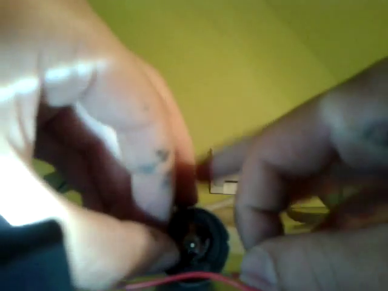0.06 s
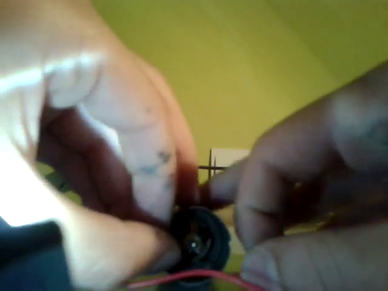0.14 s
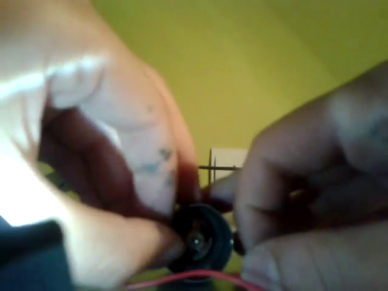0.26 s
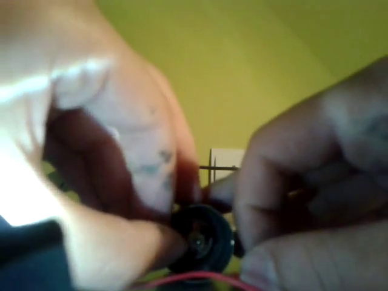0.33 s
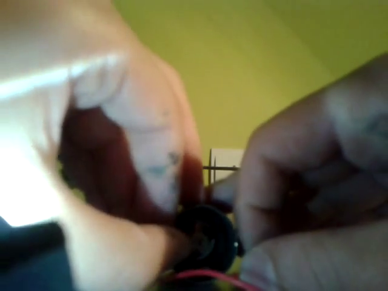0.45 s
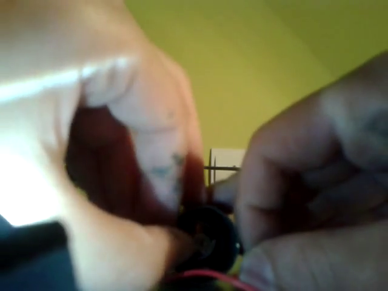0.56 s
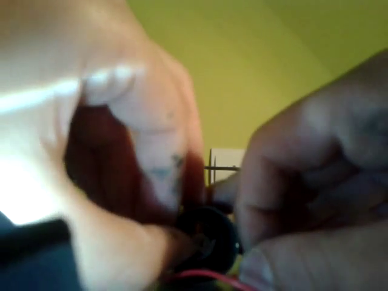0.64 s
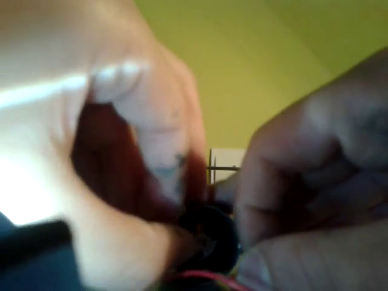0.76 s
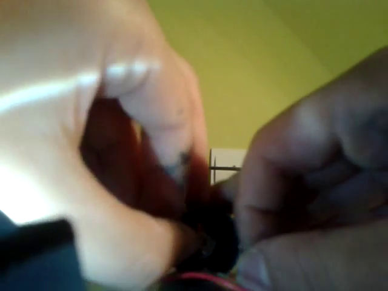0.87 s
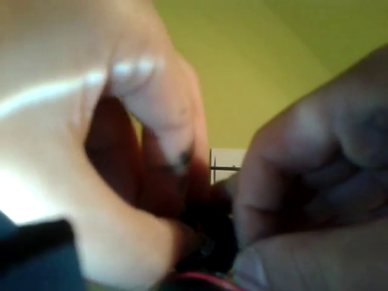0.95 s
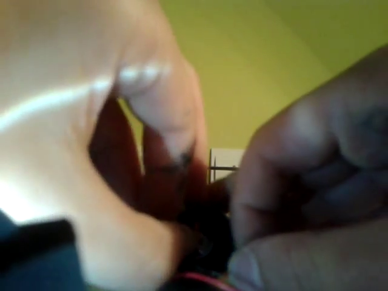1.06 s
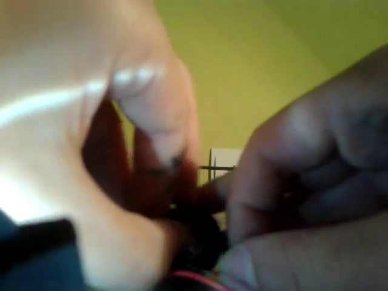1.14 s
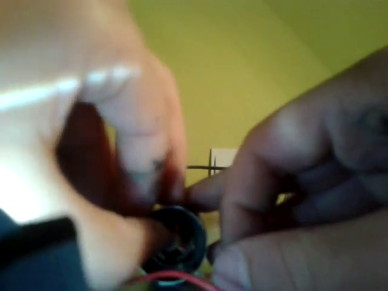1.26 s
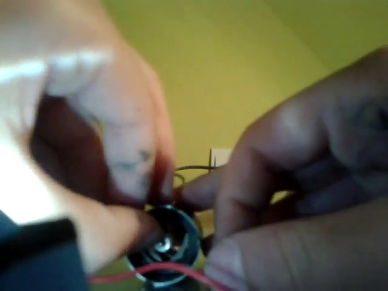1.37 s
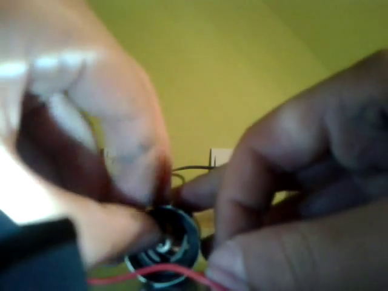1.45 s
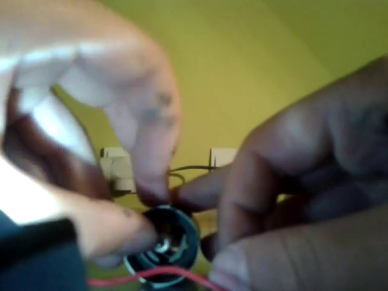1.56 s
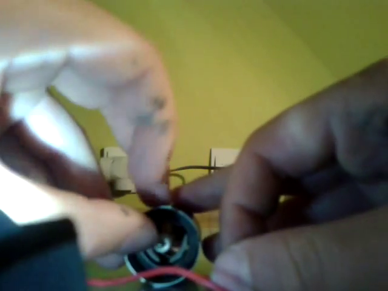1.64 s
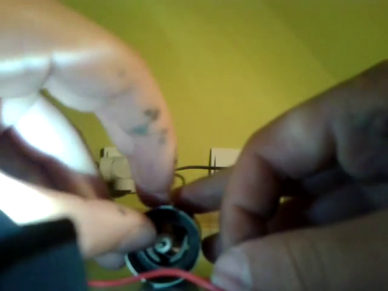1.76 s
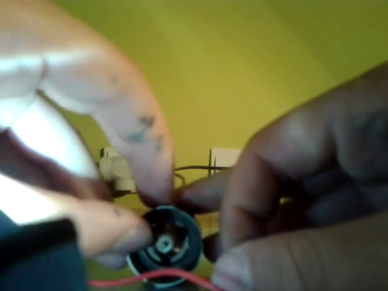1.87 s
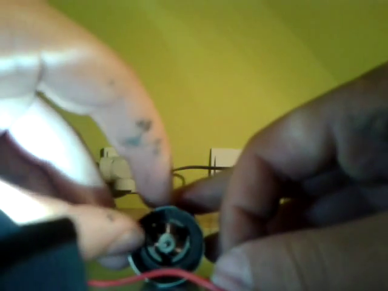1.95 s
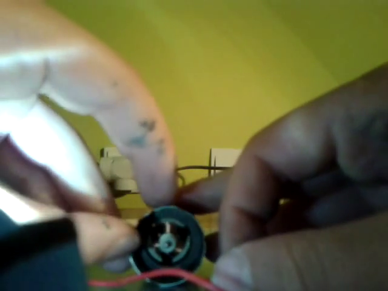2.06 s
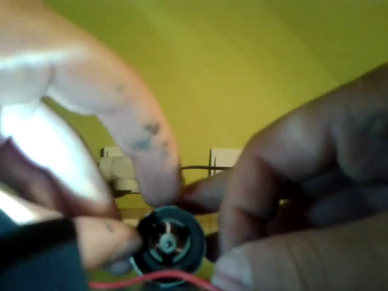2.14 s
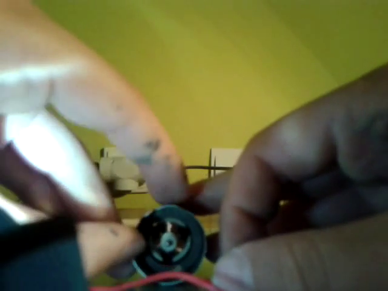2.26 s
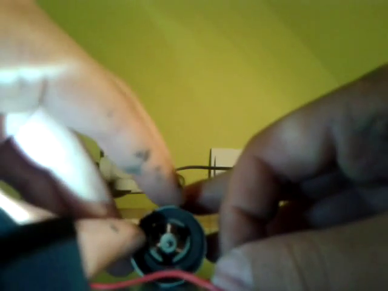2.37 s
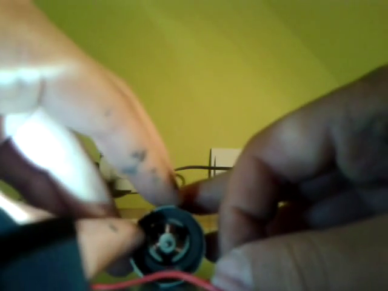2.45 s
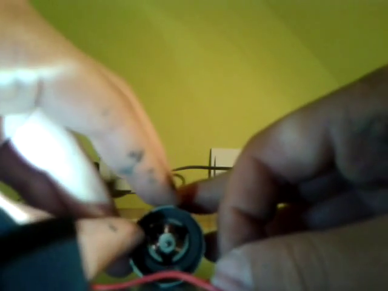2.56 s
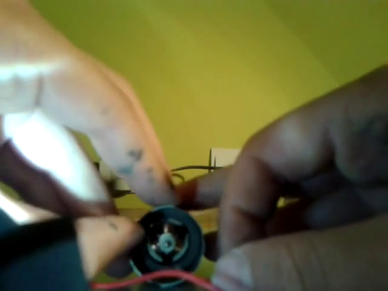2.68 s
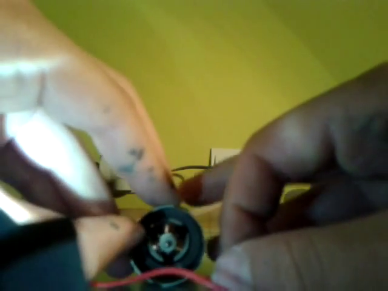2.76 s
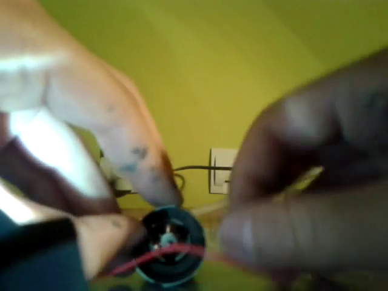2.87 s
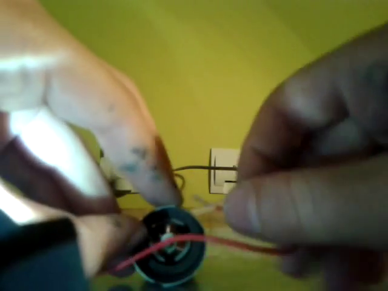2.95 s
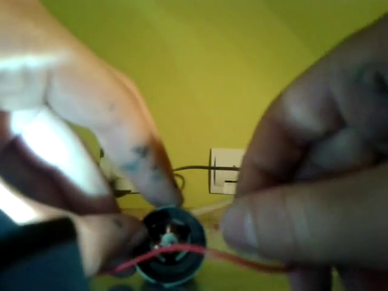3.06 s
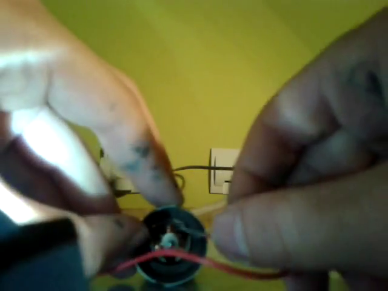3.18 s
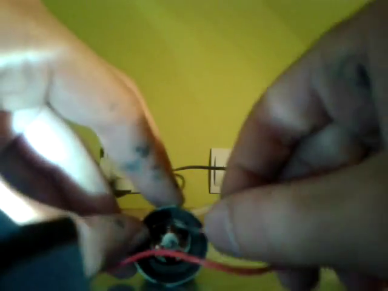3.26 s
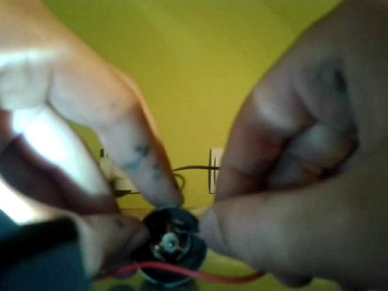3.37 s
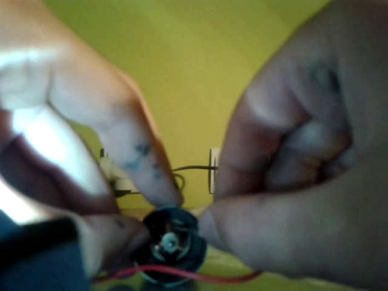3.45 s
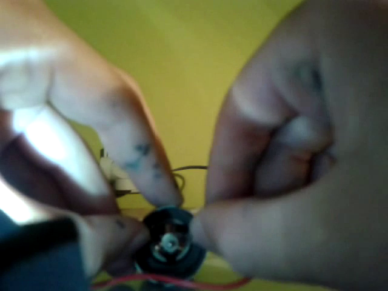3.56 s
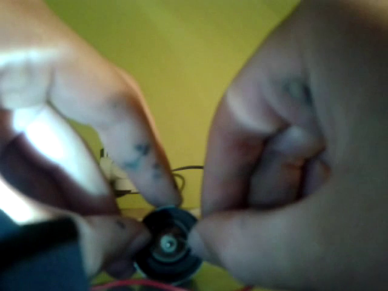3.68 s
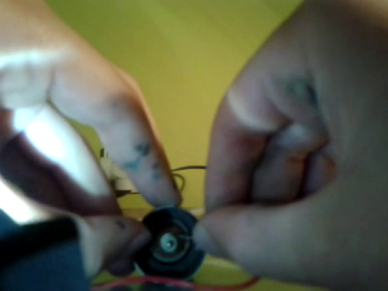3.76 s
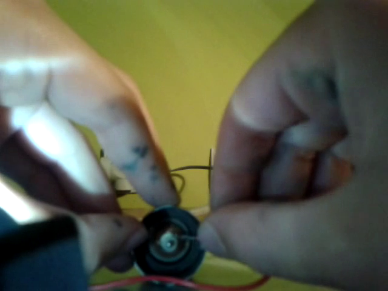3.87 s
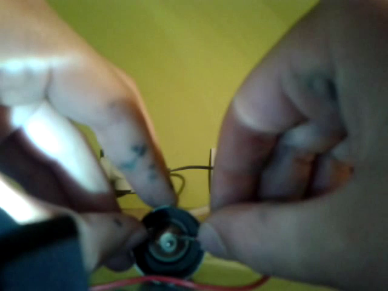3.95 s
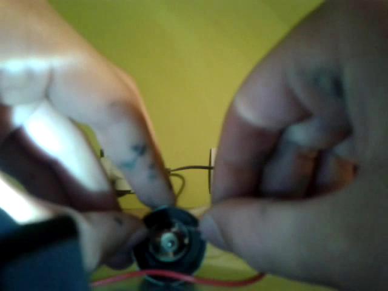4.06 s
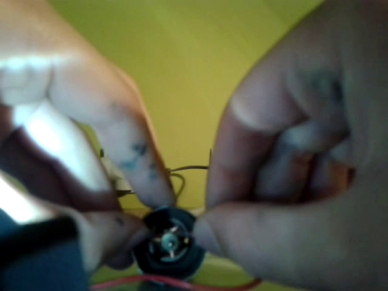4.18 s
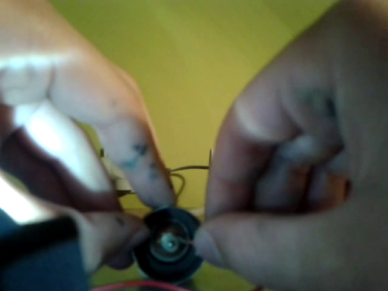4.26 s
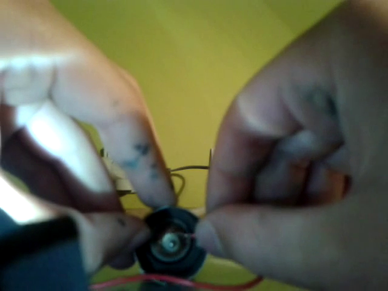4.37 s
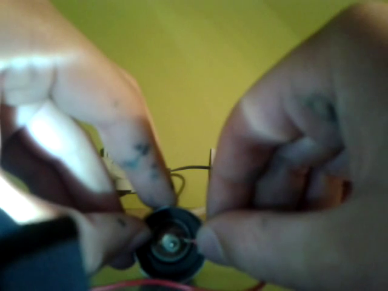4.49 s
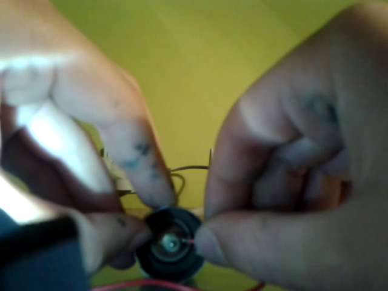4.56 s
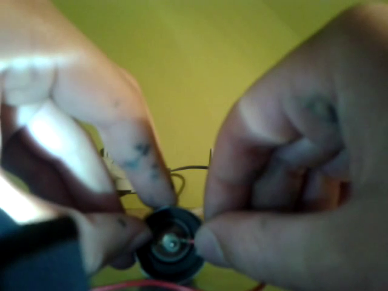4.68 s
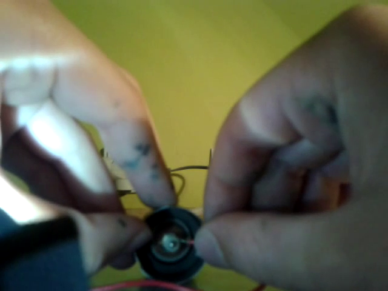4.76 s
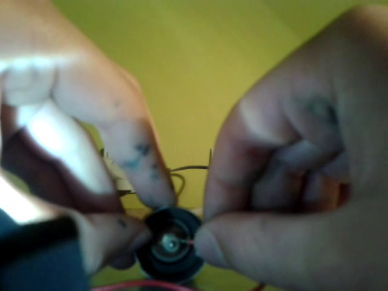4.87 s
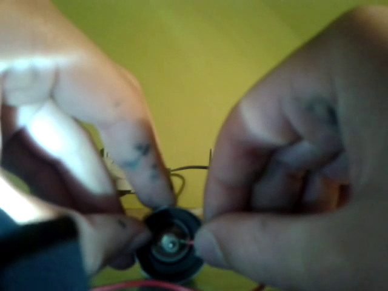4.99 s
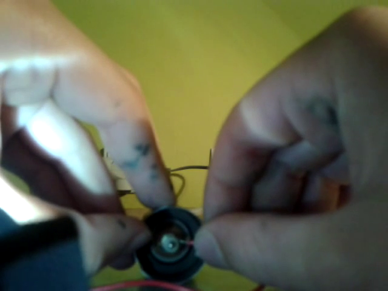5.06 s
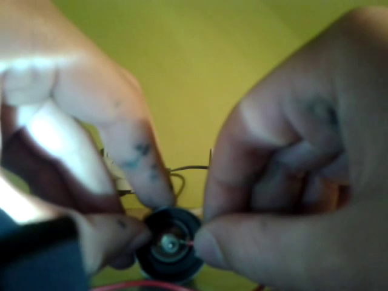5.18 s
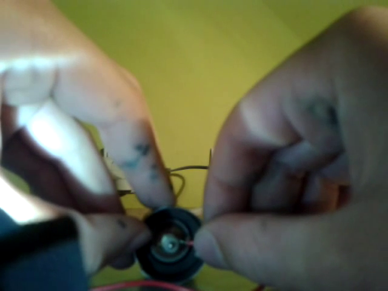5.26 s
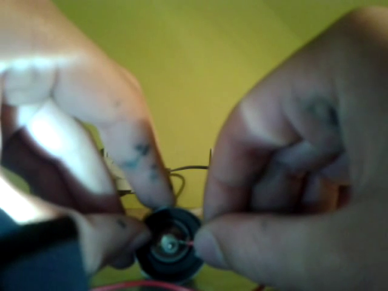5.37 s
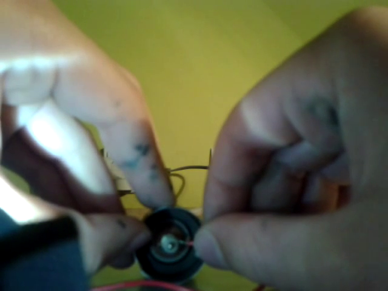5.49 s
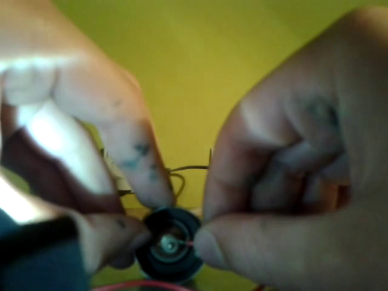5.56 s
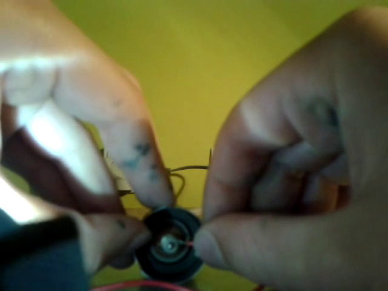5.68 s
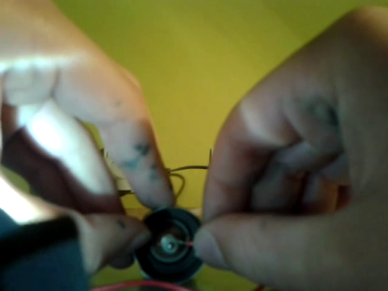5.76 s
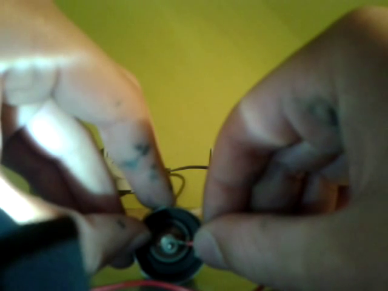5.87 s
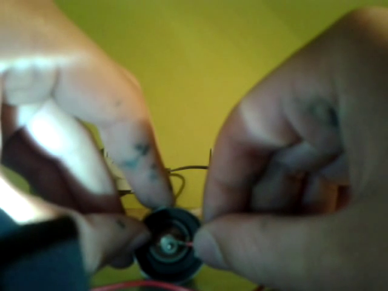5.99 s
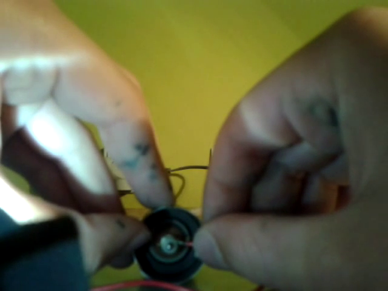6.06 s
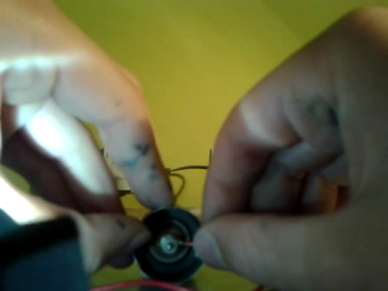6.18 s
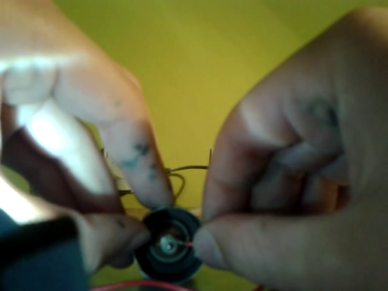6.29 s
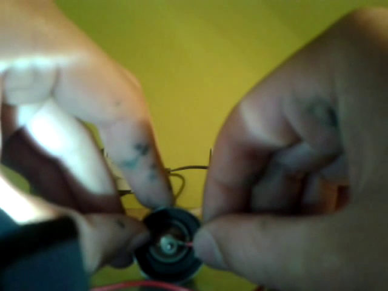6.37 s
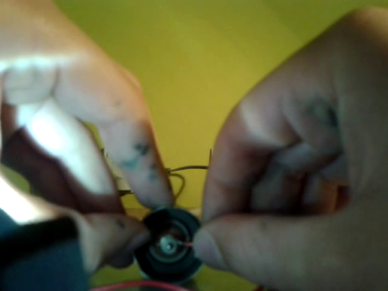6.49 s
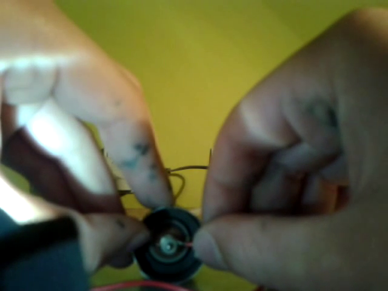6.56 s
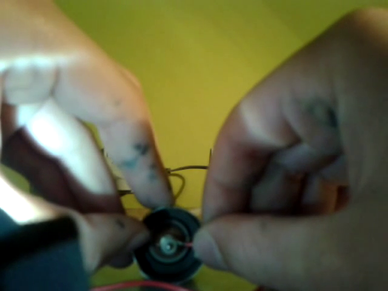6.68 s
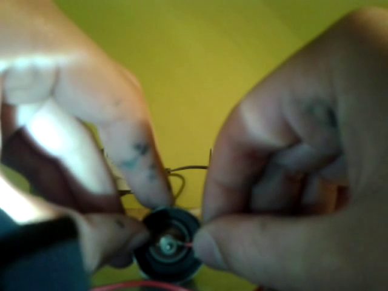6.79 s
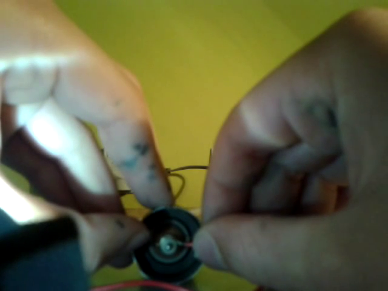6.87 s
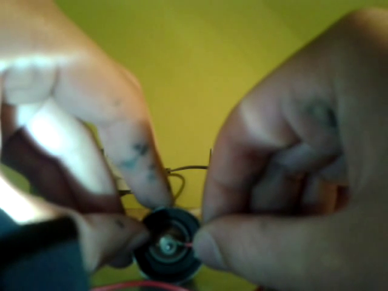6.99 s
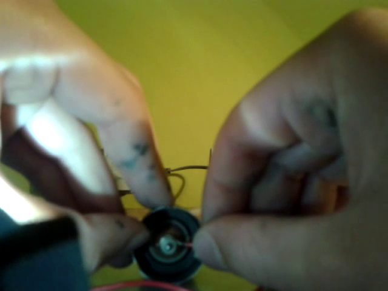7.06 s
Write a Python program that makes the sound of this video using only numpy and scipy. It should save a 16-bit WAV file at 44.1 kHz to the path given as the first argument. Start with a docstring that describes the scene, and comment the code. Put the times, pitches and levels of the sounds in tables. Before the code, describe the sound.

Close and fairly dry: dull finger nudges, small clicks and faint skin rubbing on wood over quiet hiss. After nearly four seconds a small brushed motor jerks to life with hard knocks and woody rattle, drops out, coughs once, then runs continuously. Its metallic, fizzy buzz climbs, smooths for a moment, then slows into a rougher, flickering chatter that is still going at the end.

```python
"""Small electric motor on a wooden table

A three-pole motor is held on a wooden table; fingers shift it and a loose wire is touched on.
It catches, stutters twice with hard knocks and then runs: brushes snap over the commutator three times a turn,
the rotor chatters in its bearing, and click and noise bursts through resonant filters ring table, casing and can.
Filtered clicks and grains make the handling; a small room, rumble and gated hiss lie around it."""
import sys
import numpy as np
from scipy import signal
from scipy.fft import rfft, irfft
from scipy.io import wavfile
from scipy.ndimage import uniform_filter1d

SR = 44100
rng = np.random.default_rng(int(sys.argv[2]) if len(sys.argv) > 2 else 0)


def wav_record(signal):
    """Record a signal, one row per channel, as 16-bit PCM in the file named by sys.argv[1]."""
    frames = np.transpose(np.atleast_2d(signal))
    bounded = np.clip(frames, -1, 1)
    # unit amplitude maps onto the largest positive 16-bit level
    quanta = np.round(bounded * 32767).astype(np.int16)
    wavfile.write(sys.argv[1], SR, quanta)


N = 314433
T = np.arange(N) / SR

# Rotor speed, gathering pace at each contact, then sagging under the grip: t/s, speed/(turns per s)
ROTOR_SPEED = [(3.65, 31), (3.95, 49), (4.12, 80), (4.33, 35), (4.46, 60), (4.6, 55), (4.8, 72), (4.93, 82),
               (5.15, 94), (5.3, 90), (5.52, 83.7), (5.57, 79.7), (5.62, 77.4), (5.71, 76), (5.8, 75.6),
               (5.88, 73.9), (6.05, 73.7), (6.18, 70.5), (6.27, 59.5), (6.87, 60), (7.13, 62.5)]
# Motor under full current: t/s, table level/dB, casing re table/dB, third-order hum/dB, loose chatter share/0-1
FULL_CURRENT = [(3.75, -41, -7.5, -81, 0.79), (3.95, -40, -5, -54, 0.74), (4.02, -37.5, -3, -47, 0.6),
                (4.14, -39.5, -2.5, -56, 0.44), (4.44, -39.5, -6, -52, 0.57), (4.6, -38, -6, -75, 0.17),
                (4.82, -37, -6, -48.5, 0.9), (4.91, -40.5, -5.5, -55.5, 0.25),
                (5.09, -37.5, -2.5, -62, 0.85), (5.14, -37.5, -3, -57, 0.45), (5.45, -37, -0.5, -48, .42),
                (5.58, -42, 6.5, -47.5, .13), (6.0, -43, 5, -50, .18), (6.12, -36, -2, -75, 0.49),
                (6.27, -37, -2, -50, 0.53), (6.7, -38, -1, -51.5, 0.55), (7.13, -36.5, -1.5, -46, 0.62)]
# Brush drag and can ring as the grip slows the rotor: t/s, drag re table/dB, ring re casing/dB
GRIP_BALANCE = [(3.7, -3.5, -10), (4.0, -3.5, -7.5), (4.7, -7.5, -7.5), (5.08, -6.5, -14), (5.4, -8.5, -27),
                (5.6, -6.5, -16), (5.95, -3.5, -16), (6.2, -6, -16), (6.7, -5, -15), (7.13, -3, -12)]
# Wire contacts: full current t/s, swell before it/(dB per s), wire slips off t/s
WIRE_CONTACTS = [(3.749, 282, 4.137), (4.406, 390, 4.478), (4.58, 548, 7.2)]
# Slack moments of the rattle: slack from t/s, knock on return t/s, depth approached/dB (negative swells)
SLACK_DIPS = [(6.033, 6.0594, 4.5), (6.238, 6.2627, 0), (6.283, 6.3014, -1), (6.296, 6.336, 5.5),
              (6.346, 6.368, 8), (6.387, 6.414, 0.5), (6.426, 6.471, 5), (6.513, 6.547, 3.5),
              (6.62, 6.6393, 0.5), (6.667, 6.723, 1.5), (6.761, 6.7895, 1.5), (6.798, 6.857, 1),
              (6.951, 6.9686, 4.5), (6.992, 7.023, 1.5), (7.066, 7.14, 4.5)]
# Runs of hard rotor knocks on the bearing:
# first t/s, last t/s, spacing/ms, click level/dB, table thump re click/dB, can ring re click/dB
KNOCK_RUNS = [(3.7475, 3.7475, 10, -23.5, 5, -3), (3.859, 3.859, 10, -27, 6, -3),
              (3.8965, 3.916, 9.7, -23, 5.5, 2), (3.939, 3.9674, 28, -21, 6, 3),
              (3.9822, 4.0482, 11, -20, 7.5, 0), (4.057, 4.0947, 9.1, -27.5, 15, 6),
              (4.1101, 4.1342, 11.6, -22, 7.5, 4.5), (4.1477, 4.1481, 10, -19, -14, 2),
              (4.3863, 4.3856, 10, -37, -8, 13), (4.4025, 4.4628, 12, -20, 6.5, 2.5),
              (4.5775, 4.6262, 12.3, -23, 8, 4.5), (4.862, 4.877, 16, -22.5, -3, -4),
              (4.902, 5.035, 12.1, -22, 4, -5), (5.046, 5.1, 10.8, -27, 12, -2),
              (5.369, 5.3781, 9.4, -17, -19, -40), (5.414, 5.4247, 10.7, -18.5, -19, -14),
              (5.19, 5.19, 10, -21, 0, -10), (5.2467, 5.2555, 9, -21, 0, -10),
              (6.342, 6.3517, 10, -22, 5, -3), (6.422, 6.422, 10, -21, 10, -5),
              (6.49, 6.5058, 16, -22, 9, -3), (6.607, 6.607, 10, -19, -7, -8)]
# Knock as the slack is taken up: click level/dB, table thump re click/dB, can ring re click/dB
SLACK_KNOCK = (-19, 7, -3)
# Brush drags as the rotor breaks free: t/s, click level/dB
BRUSH_DRAGS = [(3.685, -45), (3.701, -47.5), (3.717, -52), (4.332, -48.5), (4.367, -42), (4.535, -42),
               (4.556, -46)]
# Snap of each commutator segment: relative level/dB
SEGMENT_LEVELS = [0, -9, -5]
# Where each segment passes the brush: share of a turn/0-1
SEGMENT_POSITIONS = [0, .2, .59]

# Resonances: f/Hz, width/Hz, relative level/dB
TABLE_MODES = [(252.7, 14.2, -4.5), (371, 51, 1), (477, 98, -3.5), (516, 22, -6.5), (708, 117, -12.5),
               (776, 190, -8), (1084, 41, -12)]
CASING_MODES = [(2266, 98, -5), (2717, 64, 1), (3025, 150, 3), (3406, 375, 2.5), (4060, 1130, 0),
                (5540, 630, 1), (6514, 240, -1), (7600, 240, -5), (11700, 2000, -13), (13400, 820, -3.5)]
CAN_MODES = [(6347, 470, 13)]
DRAG_MODES = [(1596, 1240, 5), (3160, 300, -2)]
BRUSH_ARM_MODES = [(1482, 236, 2.5), (1723, 353, 2), (2347, 530, -4)]
# Lower and upper plastic body under a tick, the table under it, a fingernail scuff: f/Hz, width/Hz, relative level/dB
PLASTIC_LOW_MODES = [(1000, 500, -10), (1900, 500, -14), (2700, 450, 0)]
PLASTIC_HIGH_MODES = [(4170, 760, 4), (4480, 2600, -9), (5000, 370, 7), (6070, 500, -8)]
THUD_MODES = [(536, 150, 0)]
SCUFF_MODES = [(3080, 1300, 0), (4000, 700, -1)]
# Smooth response between the resonances of table and casing: f/Hz, relative level/dB
TABLE_BETWEEN = [(60, -43), (130, -18.5), (300, -15), (600, -51), (1200, -25), (2000, -76)]
CASING_BETWEEN = [(1200, -49), (2200, -20), (5000, -3), (7000, -4.5), (8200, -3), (9100, -8.5),
                  (10100, -14.5), (10500, -9.5), (12000, -9), (12800, -9.5), (13600, -44), (15000, 0.5)]

# Fingers nudge the motor on the table: t/s, push click level/dB, pitch f/Hz
FINGER_NUDGES = [(0.142, -37, 246), (0.211, -36, 416), (0.296, -41, 441), (0.409, -42, 376),
                 (0.563, -38, 410), (0.596, -33.5, 510), (0.740, -31.5, 332), (0.75, -27, 280),
                 (0.773, -36.5, 513), (1.136, -52, 202), (1.246, -44, 373), (1.643, -42.5, 510),
                 (1.851, -47, 440), (1.873, -44, 202), (2.292, -36.5, 200), (2.62, -42.5, 455),
                 (2.726, -47, 497), (2.846, -32.5, 390), (2.872, -40, 330), (3.007, -36, 370),
                 (3.418, -52, 360), (3.607, -36.5, 450)]
# Sharp plastic ticks: t/s, level before filter make-up/dB, dullness/dB (low up, high down), thud click level/dB
PLASTIC_TICKS = [(0.1465, -43, -1, -60), (0.1474, -36, -1, -60), (0.2144, -55, 3, -60),
                 (0.7485, -69, -6, -48), (0.887, -54, 2, -70), (1.6398, -52, -4, -28.5),
                 (1.6444, -46.5, -8, -58), (1.646, -53, -10, -58), (2.2886, -52.5, -4.5, -59),
                 (3.012, -62.5, 8, -60)]
# Hands rub along the table: start t/s, held/s, level/dB
HAND_RUBS = [(0.149, 0.077, -61), (.41, 0.05, -67.5), (.56, 0.069, -65.5), (0.747, 0.027, -61.5),
             (1.1, 0.054, -71), (1.25, 0.019, -66), (1.64, .02, -68.5), (1.86, 0.075, -72.5),
             (2.278, 0.027, -68), (2.62, 0.065, -67), (2.85, 0.36, -64.5), (3.419, 0.33, -69.5),
             (3.602, 0.048, -61)]
# Noise colours of the rub, hiss and rumble: f/Hz, relative density/(dB per Hz)
RUB_COLOUR = [(35, -37), (60, -3.5), (186, 1), (427, -2), (495, -7), (629, -6), (690, -7.5), (846, -9.5),
              (5000, -21), (6500, -24), (11000, -120)]
HISS_COLOUR = [(590, -62), (1000, -7), (1560, -6), (1900, -7), (4650, -5), (14300, 0), (15000, 0),
               (15500, -9)]
RUMBLE_COLOUR = [(20, -7), (96, 1.5), (188, -1), (303, -31), (434, -2.5), (721, -22), (1000, -24),
                 (1300, -53), (2200, -120)]

# Motor settings
COAST_DB_PER_S, SILENT_DB = 744, -53   # fall after the wire slips off, deepest drop
COAST_CASING_SHARE = 0.78   # share of the table's drop that reaches the casing
SLACK_S, DIP_CASING_SHARE = 0.008, 0.8   # time constant of going slack; share of it in the casing
PROUD_PASSES_S = 5.7116   # one moment at which the proud segment meets the brush
UNEVEN_DB, SPEED_WOBBLE = 4, 0.012   # snap spread and unsteadiness for a wholly loose rotor
CHATTER_PULSE, HUM_WAVER_DB = 0.23, 1.8   # share of chatter throbbing with the segments; hum wander
TABLE_SHIFT, TABLE_SHIFT_S = 0.028, 0.15   # detuning of the table resonances; seconds between new blends
KNOCK_TOP_HZ = 11100

# Hand settings
RUB_FADE_DB_PER_S, RUB_REST_DB = 82, -76.5
SCUFF_S, SCUFF_LENGTH_S, SCUFF_DB = 2.93, 0.045, -70

# Room and background settings
ROOM_T60_S, ROOM_DB = 0.21, -12.5
HANDS_ROOM_DB = -7   # the hands are nearer than the motor's body, so less room
HISS_REST_DB, GATE_FROM_DB, GATE_SHARE, GATE_TOP_DB, GATE_CLOSE_DB_PER_S = -71, -80.5, 0.25, 8, 101
RUMBLE_REST_DB, SINK_FROM_DB, SINK_SHARE = -73.5, -56, 0.45   # above SINK_FROM_DB the rumble sinks by this share
CUTOFF_HZ = 15750


def motor():
    """Commutator snaps and bearing chatter excite table, casing and can; the third order hums."""
    drag_db, ring_db = in_time(GRIP_BALANCE)
    full_db, casing_re_db, hum_db, loose = in_time(FULL_CURRENT)
    drop_db, dip_db = current_drop_db(), slack_dip_db()
    table_db = full_db + drop_db - dip_db
    casing_db = full_db + casing_re_db + COAST_CASING_SHARE * drop_db - DIP_CASING_SHARE * dip_db
    hum_db = hum_db + drop_db - dip_db
    running = T > ROTOR_SPEED[0][0]

    turns = rotor_turns(loose)
    snaps, push = commutator(turns, loose)
    chatter = bearing_chatter(turns)
    shake = evened(0.19 * (1 - loose) * push + np.sqrt(loose) * chatter, ms=70)
    shake = shake * running
    fizz = evened(np.sqrt(1 - loose) * snaps + 0.6 * np.sqrt(loose) * chatter, ms=70)
    fizz = fizz + 0.57 * rng.standard_normal(N)   # brushes also slide with a smooth hiss
    fizz = fizz * from_db(casing_db) * running

    knock, thump, can_knock = bearing_knocks()
    table = held_table(shake * from_db(table_db) + thump)
    casing = body(fizz + from_db(7) * knock, CASING_MODES, CASING_BETWEEN)
    can = body(can_knock + from_db(ring_db) * fizz, CAN_MODES)
    drag = brush_drag(shake * from_db(table_db + drag_db), thump)
    return table + casing + can + drag + third_order_hum(turns, hum_db) * running


def rotor_turns(loose):
    """Turns made so far: speed summed over time, less steady when the rotor is loose."""
    speed, = in_time(ROTOR_SPEED)
    wobble = SPEED_WOBBLE * loose ** 2 * wander(0.05)
    turns = np.cumsum(speed * (1 + wobble)) / SR
    return turns - np.interp(PROUD_PASSES_S, T, turns) % 1


def commutator(turns, loose):
    """Each segment passing the brush gives a snap and a soft push, scattered in strength and time by looseness."""
    passes = np.arange(int(turns[-1]))[:, None] + SEGMENT_POSITIONS
    at = np.interp(passes.ravel(), turns, T)
    loose_at = np.interp(at, T, loose)
    uneven_db = UNEVEN_DB * loose_at
    luck = np.clip(rng.standard_normal((len(at), 3)), -1.3, 1.3)   # for snap, timing and push
    segment_db = np.resize(SEGMENT_LEVELS, len(at))
    snap_db = segment_db * (1.1 - loose_at) + uneven_db * luck[:, 0]
    at = at + 0.00004 * uneven_db * luck[:, 1]

    # the proud segment gives a long bright burst once a turn, the other two short dull snaps
    proud = blow(train(at[::3], snap_db[::3]), ms=1.2, rough=0.2)
    proud = lowpass(proud, 9000)
    is_other = np.arange(len(at)) % 3 > 0
    others = blow(train(at[is_other], snap_db[is_other]), ms=0.6, rough=0.2)
    others = lowpass(others, 6000, order=2) * from_db(-1)

    # the table feels soft pushes, so its resonances pick out multiples of the turn rate
    push = train(at, 0.6 * segment_db + uneven_db * luck[:, 2])
    push = lowpass(push + 1e-18, 2500)
    return rms_one(proud + others), rms_one(push)


def bearing_chatter(turns):
    """Random micro-contacts of the loose rotor, throbbing three times a turn."""
    grains = (rng.random(N) < 1200 / SR) * from_db(0.76 * np.minimum(rng.exponential(1, N), 4))
    throb = 1 + CHATTER_PULSE * np.cos(6 * np.pi * turns - 1)
    return rms_one(scrape(grains, ms=0.54) * throb)


def bearing_knocks():
    """Hard rotor blows on the bearing, as separate drives for casing, table and can."""
    s, db, thump_db, can_db = knock_list()
    knock = lowpass(blow(train(s, db), ms=2.0, rough=0.22), KNOCK_TOP_HZ)
    thump = blow(train(s, db + thump_db), ms=0.42, rough=0.23)
    can_knock = blow(train(s, db + can_db), ms=2.2, rough=0.2)
    return knock, thump, can_knock


def knock_list():
    """Times, click levels, thumps and can rings: evenly spaced within each run, plus one at each slack return."""
    rows = []
    for first, last, spacing_ms, *levels in KNOCK_RUNS:
        count = 1 + round(1000 * (last - first) / spacing_ms)
        rows += [(s, *levels) for s in np.linspace(first, last, count)]
    rows += [(back, *SLACK_KNOCK) for _, back, _ in SLACK_DIPS]
    return np.transpose(rows)


def brush_drag(shake, thump):
    """Brushes scrape as the rotor breaks free, and their arm rings under shake and thumps."""
    breaking_free = scrape(train(*np.transpose(BRUSH_DRAGS)), ms=15.7)
    arm = body(shake + from_db(-8.5) * thump, BRUSH_ARM_MODES)
    return body(breaking_free, DRAG_MODES) + arm


def third_order_hum(turns, level_db):
    """A sine at three cycles a turn, wandering in level."""
    level_db = level_db + HUM_WAVER_DB * wander(0.04)
    return np.sqrt(2) * from_db(level_db) * np.sin(6 * np.pi * turns)


def current_drop_db():
    """Drop in dB below full running: a swell into each contact, a quick fall after it."""
    drops = []
    for full, swell, off in WIRE_CONTACTS:
        before = swell * np.maximum(full - T, 0)
        after = COAST_DB_PER_S * np.maximum(T - off, 0)
        drops.append(-before - after)
    return np.maximum(np.max(drops, axis=0), SILENT_DB)


def slack_dip_db():
    """Dips in dB: the rattle eases towards slack and snaps back at the return."""
    dip_db = np.zeros(N)
    for s, back, depth_db in SLACK_DIPS:
        easing = 1 - np.exp(-np.maximum(T - s, 0) / SLACK_S)
        dip_db += depth_db * (T < back) * easing
    return dip_db


def held_table(x):
    """The table under shifting fingers: a wandering blend of resonances tuned a little up and a little down."""
    high = np.clip(0.5 + 0.4 * wander(TABLE_SHIFT_S), 0, 1)
    table = np.zeros(N)
    for share, shift in ((high, TABLE_SHIFT), (1 - high, -TABLE_SHIFT)):
        modes = [(hz * (1 + shift), width, db) for hz, width, db in TABLE_MODES]
        table += body(x * share, modes, TABLE_BETWEEN)
    return table


def handling():
    """Hands on the motor: soft thumps through the table, plastic ticks, a patchy rub and a nail scuff."""
    grains = (rng.random(N) < 2500 / SR) * from_db(2 * rng.exponential(1, N))
    return nudges() + ticks() + rub(grains) + scuff(grains)


def nudges():
    """Each push is a short dying burst, band-passed around its own pitch."""
    thumps = np.zeros(N)
    for s, db, hz in FINGER_NUDGES:
        span = slice(int(s * SR), int(s * SR) + 6000)
        push = scrape(train([s], [db]), ms=10.3)[span]
        band = signal.butter(2, [hz / 1.5, hz * 1.41], "band", fs=SR, output="sos")
        thumps[span] += signal.sosfilt(band, push)
    return thumps


def ticks():
    """Sharp clicks ring the plastic low and high, balanced by dullness, with a thud in the table."""
    s, db, dull_db, thud_db = np.transpose(PLASTIC_TICKS)
    low = body(blow(train(s, db + 13 + dull_db), ms=0.23, rough=0.28), PLASTIC_LOW_MODES)
    high = body(blow(train(s, db + 9 - dull_db), ms=0.24, rough=0.078), PLASTIC_HIGH_MODES)
    return low + high + body(train(s, thud_db), THUD_MODES)


def rub(grains):
    """Skin on wood: smeared, coloured grains under the rub level."""
    return body(rms_one(scrape(grains, ms=4.7)), bed=RUB_COLOUR) * from_db(rubbing_db())


def rubbing_db():
    """Each rub starts at once, holds and fades; a faint rustle remains."""
    rubs = []
    for s, held, db in HAND_RUBS:
        fading_db = db - RUB_FADE_DB_PER_S * np.maximum(T - s - held, 0)
        rubs.append(np.where(T > s, fading_db, RUB_REST_DB))
    return np.maximum(np.max(rubs, axis=0), RUB_REST_DB)


def scuff(grains):
    """A fingernail scuffs the plastic: a brief stretch of short-smeared grains through its resonances."""
    during = (T > SCUFF_S) * (T < SCUFF_S + SCUFF_LENGTH_S)
    return from_db(SCUFF_DB) * body(rms_one(scrape(grains, ms=1.5)) * during, SCUFF_MODES)


def room(x):
    """Small-room reverb: a dying noise tail, duller than the direct sound."""
    t = T[:SR // 2]
    tail = rng.standard_normal(len(t)) * from_db(-60 * t / ROOM_T60_S) * (t > 0.004)
    tail = signal.lfilter([1], [1, -0.4], tail)
    return from_db(ROOM_DB) * signal.oaconvolve(x, tail / np.sqrt(np.sum(tail ** 2)))[:N]


def gated_hiss(near):
    """Coloured noise that a gate lets swell with nearby sound."""
    level_db = followed_db(near, GATE_CLOSE_DB_PER_S)
    open_db = np.clip(GATE_SHARE * (level_db - GATE_FROM_DB), 0, GATE_TOP_DB)
    return body(rng.standard_normal(N), bed=HISS_COLOUR) * from_db(HISS_REST_DB + open_db)


def rumble(near):
    """Low coloured noise, pushed down by loud sound."""
    sink_db = -SINK_SHARE * np.maximum(followed_db(near, fall_db_per_s=300) - SINK_FROM_DB, 0)
    return body(rng.standard_normal(N), bed=RUMBLE_COLOUR) * from_db(RUMBLE_REST_DB + sink_db)


def from_db(db):
    """Gain of a level in dB."""
    return 10 ** (np.asarray(db) / 20)


def rms_one(x):
    """Scale to rms 1 over the part that sounds."""
    return x / np.sqrt(np.mean(x[x != 0] ** 2) + 1e-20)


def in_time(rows):
    """Columns of a curve table, sample by sample."""
    s, *columns = np.transpose(rows)
    return [np.interp(T, s, c) for c in columns]


def body(x, modes=(), bed=((10, -70), (20000, -70)), size=8192):
    """Causal (minimum-phase) filter: resonances standing on a smooth bed, unit power gain."""
    hz = np.maximum(np.arange(size // 2 + 1) * SR / size, 1)
    bed_hz, bed_db = np.transpose(bed)
    power = from_db(2 * np.interp(np.log(hz), np.log(bed_hz), bed_db))
    for centre_hz, width_hz, db in modes:
        detuning = (hz - centre_hz ** 2 / hz) / width_hz
        power = power + from_db(2 * db) / (1 + detuning ** 2) ** 2
    # folding the cepstrum forward in time gives minimum phase
    cepstrum = irfft(np.log(power) / 2)
    cepstrum[1:size // 2] *= 2
    cepstrum[size // 2 + 1:] = 0
    pulse = irfft(np.exp(rfft(cepstrum)))
    return signal.oaconvolve(x, pulse / np.sqrt(np.sum(pulse ** 2)))[:N]


def lowpass(x, hz, order=1):
    """Soften the top with a Butterworth filter."""
    return signal.sosfilt(signal.butter(order, hz, fs=SR, output="sos"), x)


def train(times, levels_db):
    """Clicks at the given times."""
    x = np.zeros(N)
    samples = np.clip((np.asarray(times) * SR).astype(int), 0, N - 1)
    np.add.at(x, samples, from_db(levels_db))
    return x


def scrape(clicks, ms):
    """Spread every click into a short dying burst of micro-contacts."""
    tail = signal.lfilter([1], [1, -np.exp(-1000 / (ms * SR))], np.abs(clicks) + 1e-18)
    return tail * rng.choice([-1, 1], N)


def blow(clicks, ms, rough):
    """A clean impact followed by a short dying burst of micro-contacts."""
    return clicks + rough * scrape(clicks, ms)


def evened(x, ms):
    """Hold the running level at 1."""
    return x / np.sqrt(uniform_filter1d(x ** 2, int(ms * SR / 1000)) + 1e-9)


def wander(step_s):
    """Random values joined by straight lines, spread 1."""
    return rms_one(np.interp(T, step_s * np.arange(300), rng.standard_normal(300)))


def followed_db(x, fall_db_per_s):
    """Level of a sound in dB over 10 ms, rising at once and falling slowly."""
    level = 10 * np.log10(uniform_filter1d(x ** 2, SR // 100) + 1e-12)
    return np.maximum.accumulate(level + fall_db_per_s * T) - fall_db_per_s * T


def scene():
    """Motor and hands in the room, over hiss and rumble that follow their level."""
    machine, hands = motor(), handling()
    near = machine + hands
    reverb = room(machine + from_db(HANDS_ROOM_DB) * hands)
    return (near + reverb + gated_hiss(near) + rumble(near))[None]


def record(dry):
    """Peaks are rounded; the top falls away near 15 kHz and is then cut."""
    rounded = 0.16 * np.tanh(dry / 0.16)
    rolled = signal.sosfilt(signal.ellip(6, 0.5, 22, 14950, fs=SR, output="sos"), rounded)
    return signal.sosfilt(signal.cheby2(16, 60, CUTOFF_HZ + 100, fs=SR, output="sos"), rolled)


dry = scene()
out = record(dry)
wav_record(out)
```